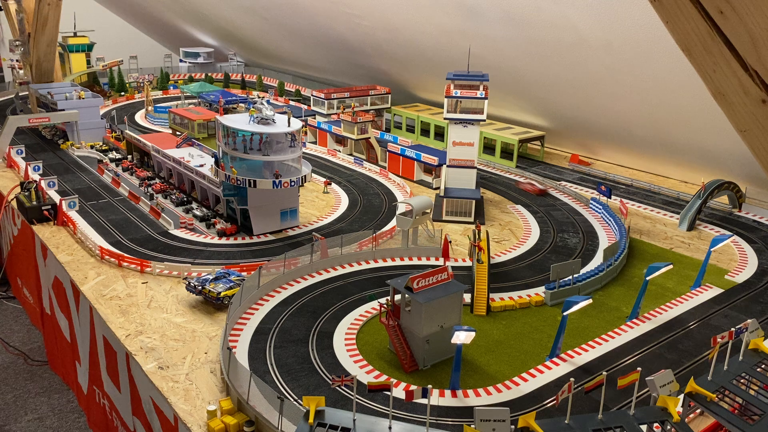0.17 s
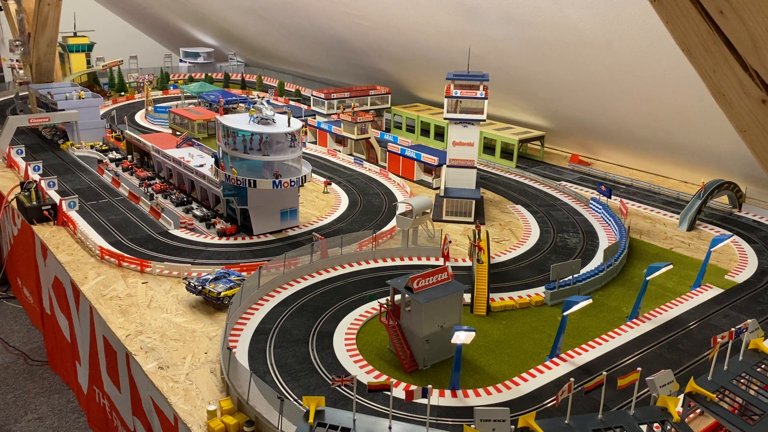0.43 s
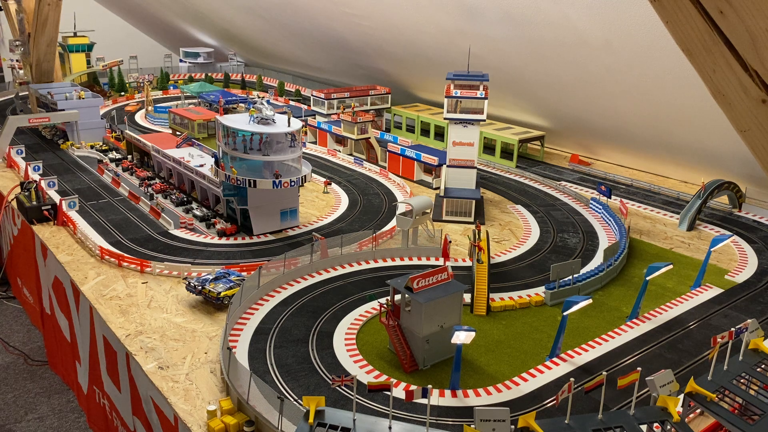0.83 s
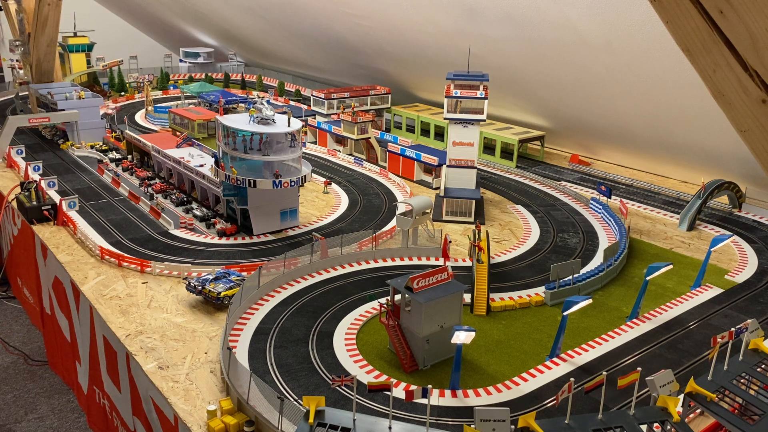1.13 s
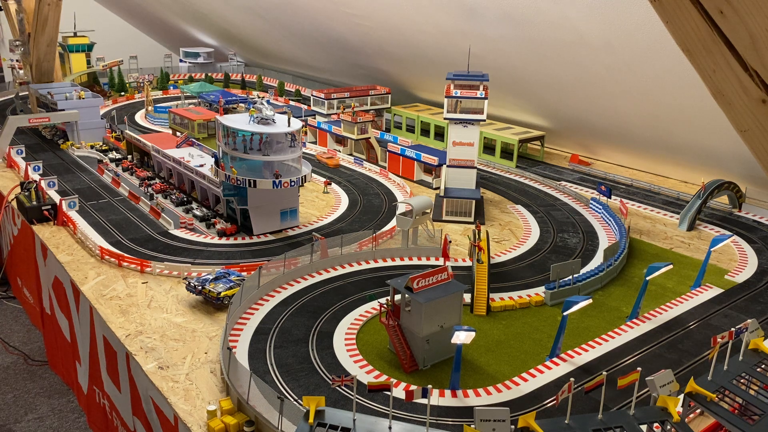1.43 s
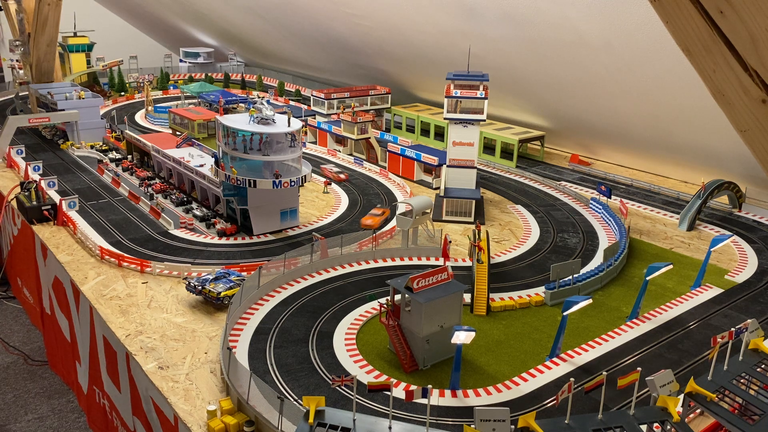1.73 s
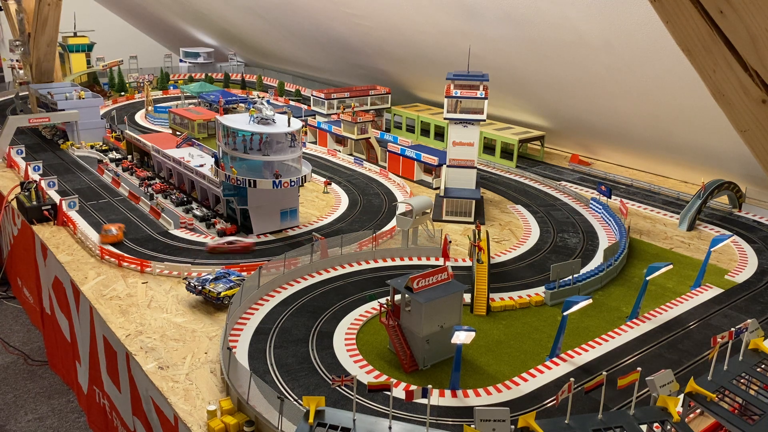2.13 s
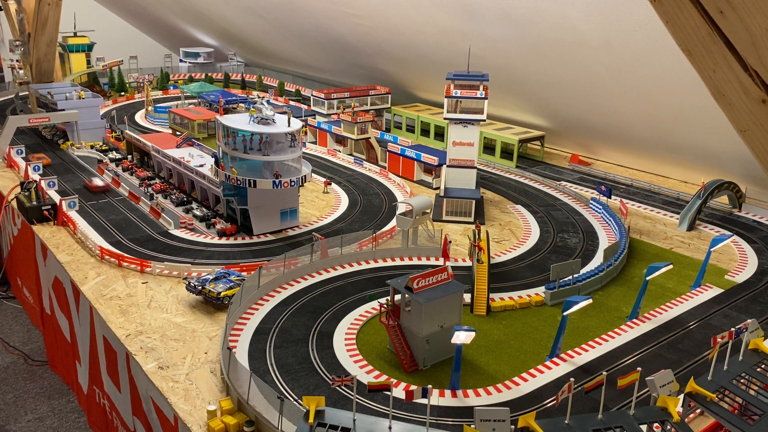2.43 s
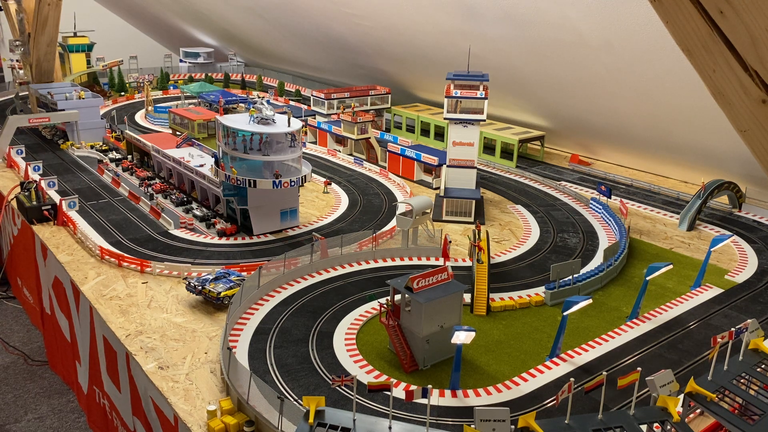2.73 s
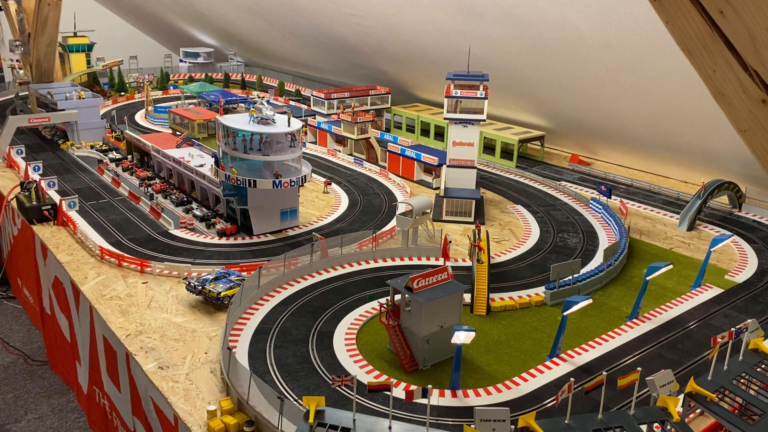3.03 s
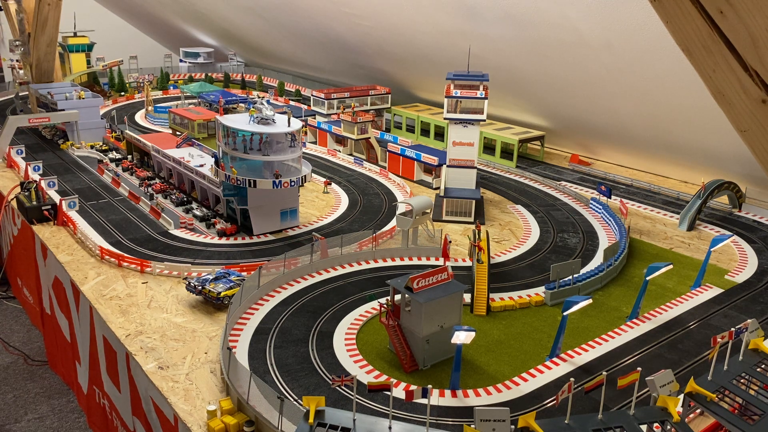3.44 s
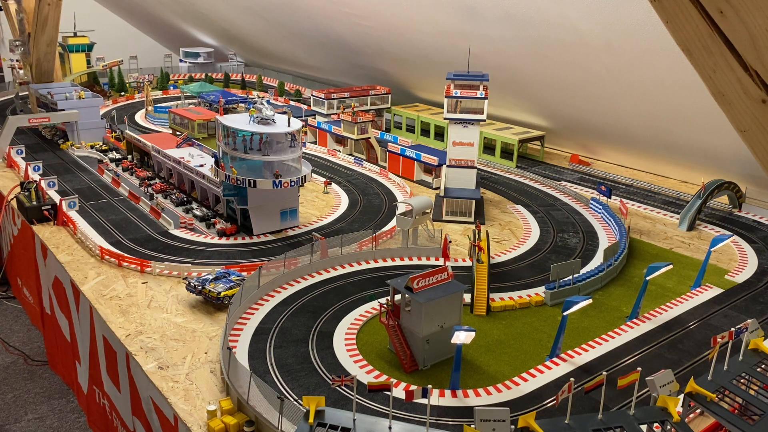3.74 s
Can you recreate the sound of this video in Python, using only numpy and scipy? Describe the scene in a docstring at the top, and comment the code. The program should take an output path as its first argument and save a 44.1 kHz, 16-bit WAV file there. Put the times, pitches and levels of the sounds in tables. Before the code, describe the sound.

Small toy racing cars rattle through a near bend, whine higher, slow down and fade, then speed up again; braids hiss, tyres rasp and lane switches clack, with a short, dry attic room response.

```python
"""Slot cars in an attic

Two slot cars lap a plastic track on a tabletop in an attic, heard by a small stereo microphone pair.
Gears whine with speed, pickup braids hiss on the rails, tyres rasp and the table rumbles.
Cars clack over lane switches and thump over joints; at first one rattles loudly through the nearest bend.
Whines are phase-run tones with rasp, rubbing is coloured noise, and knocks are short decaying modes."""
import sys
import numpy as np
from scipy import signal
from scipy.fft import rfft, irfft, next_fast_len
from scipy.io import wavfile
from scipy.ndimage import uniform_filter1d, map_coordinates

SR = 44100
rng = np.random.default_rng(int(sys.argv[2]) if len(sys.argv) > 2 else 0)


def master(y):
    """Save y as 16-bit WAV."""
    cut = np.clip(np.atleast_2d(y).T, -1, 1)
    pcm = np.round(cut * 32767)  # scale
    wavfile.write(sys.argv[1], SR, pcm.astype(np.int16))


N = 171108

# Table levels are relative; most sources add a trim, thumps and wheel hum do not.
# Gear mesh of each car: time_s, mesh_pitch_hz, level_db
CAR_A_MESH = [(0, 2740, -39), (.08, 2662, -46), (.115, 2028, -43), (.18, 1828, -38), (.25, 1996, -38.5),
              (.34, 2245, -39.5), (.42, 2395, -42.5), (.52, 2460, -44.5), (.72, 1794, -49), (.88, 998, -52),
              (.96, 1100, -47), (1.02, 1270, -47), (1.11, 1420, -43), (1.25, 1800, -49), (1.4, 1480, -48),
              (1.49, 1402, -40.5), (1.8, 1314, -42.5), (2.07, 1381, -40), (2.2, 1682, -44.5),
              (2.37, 1818, -38.5), (2.47, 2080, -38.5), (2.55, 2350, -43.5), (2.65, 2620, -40.5),
              (2.7, 2597, -47), (2.85, 1699, -72), (3.03, 1609, -58), (3.12, 1812, -44), (3.2, 2030, -39.5),
              (3.35, 1900, -52), (3.49, 1896, -43.5), (3.6, 1755, -47), (3.67, 1990, -43),
              (3.77, 2392, -49), (3.88, 2600, -43)]
CAR_B_MESH = [(0, 1250, -69), (.5, 1123, -49), (.6, 1129, -36.5), (.75, 1033, -54), (1.3, 1499, -57),
              (1.5, 1601, -47), (1.61, 1994, -39.5), (1.8, 1501, -56), (2.26, 1311, -39.5),
              (2.45, 1375, -60), (2.72, 1420, -43), (2.88, 1295, -49), (3.03, 1401, -51), (3.35, 1420, -50),
              (3.47, 1508, -45), (3.68, 1400, -39), (3.77, 1750, -43.5), (3.83, 1972, -39.5),
              (3.88, 2140, -41)]
# Gear whine partials: multiple of the mesh pitch, level_db
GEAR_PARTIALS = [(1, 0.5), (1.2, -10), (2.16, -13)]
GEAR_DB, PINION_TEETH, SHAFT_DEPTH = 2.5, 9, 0.42
GEAR_JITTER = 0.0203  # rms share of the pitch
GEAR_RASP, RASP_RATE = 0.88, 280  # rasp against tone; knots a second
GEAR_FLUTTER_DB, GEAR_SWAY_DB, SWAY_RATE = 1.5, 1.3, 40  # rms dB, rms dB, knots a second
# The body shell rings when an overtone sweeps through it
SHELL_HZ, SHELL_WIDTH_HZ, SHELL_DB = 5660, 220, 11

# Brief chirps as the gears bite: start_s, level_db, pitch_hz
CHIRPS = [(.109, -26.5, 1960), (.134, -23.5, 1990), (.257, -30, 2040), (.34, -24.5, 2216),
          (1.089, -29.5, 1480), (1.478, -25, 1485), (2.266, -27, 1270), (2.382, -29, 1890),
          (2.539, -25, 1393)]
CHIRP_RISE_S = 0.003

# Pickup braid hiss, tyre rasp and hollow plastic deck, each: time_s, level_db
BRAID_LEVEL = [(0.0, -28.5), (0.04, -34), (0.22, -39), (0.24, -35), (0.5, -35.5), (0.73, -49.5),
               (1.13, -43), (1.4, -46.5), (1.62, -40.5), (1.8, -44.5), (2.2, -40), (2.28, -41.5),
               (2.48, -34.5), (2.66, -36), (2.73, -47.5), (2.88, -55), (3.21, -40.5), (3.35, -47.5),
               (3.88, -37)]
TYRE_LEVEL = [(0.03, -27.5), (0.06, -35), (0.57, -35), (0.71, -39), (0.89, -41), (0.95, -37), (1.46, -39),
              (1.51, -36), (2.7, -34), (2.89, -43), (3.24, -36), (3.26, -37.5), (3.41, -42), (3.46, -35.5),
              (3.88, -37)]
DECK_LEVEL = [(.03, -29.5), (.07, -39), (.5, -43), (.62, -39), (.8, -47), (1.1, -44), (1.52, -43.5),
              (1.6, -35.5), (1.68, -39), (1.9, -40.5), (2.17, -35.5), (2.28, -44), (2.45, -40), (2.68, -37),
              (2.92, -48), (3.3, -45.5), (3.88, -46)]
# Table board: time_s, drone_level_db, boom_level_db
BOARD_LEVEL = [(0, -35, -36.5), (.14, -46, -41.5), (.3, -43.5, -42.5), (.48, -43, -44.5),
               (.66, -39.5, -37.5), (.82, -48.5, -51.5), (1, -50, -53), (1.4, -46, -46), (1.62, -43, -40.5),
               (1.85, -44, -43.5), (2.15, -44, -51), (2.45, -45, -49.5), (2.76, -39.5, -44),
               (2.92, -49, -50.5), (3.25, -41.5, -45.5), (3.52, -40, -48), (3.7, -45, -39),
               (3.88, -40, -45)]
# Deep rumble: time_s, level_db
RUMBLE_LEVEL = [(0, -48), (.3, -46), (.55, -50), (.8, -49), (1.05, -51.5), (1.6, -48), (2.2, -46.5),
                (2.5, -51), (3.1, -49), (3.45, -50.5), (3.88, -41.5)]
# Spectra of the rubbing and the board, each: frequency_hz, density_db (per Hz)
BRAID_COLOUR = [(1500, -15), (3000, -7.5), (4100, -4.5), (5400, 1.5), (6500, -1), (7500, 1), (8900, -5.5),
                (9900, -0.5), (10800, -4.5), (12200, -6.5), (14500, -4), (15800, -7.5)]
TYRE_COLOUR = [(600, -19), (1000, -8.5), (1380, 2.5), (1650, -1.5), (2000, 0.5), (2550, -5.5), (3000, -7.5),
               (4000, -11.5), (7000, -16), (12000, -76)]
DECK_COLOUR = [(200, -44), (450, 0), (650, -0.5), (850, 1.5), (1100, 1.5), (1500, -11), (3000, -36)]
DRONE_COLOUR = [(100, -21), (190, -4), (240, 3.5), (310, 0.5), (440, -1), (600, -14), (1200, -38)]
BOOM_COLOUR = [(60, -30), (92, -6), (128, 5), (175, -2.5), (240, -13), (600, -74)]
RUMBLE_COLOUR = [(20, -42), (31, -7), (48, -5.5), (62, -0.5), (80, 0.5), (100, -4), (200, -29)]
BRAID_DB, TYRE_DB, DECK_DB, DRONE_DB, BOOM_DB, RUMBLE_DB = 2, -1.5, 0, 1, 0, 2.5

# A wheel drums on the board as the car passes close: time_s, axle_turns_hz, level_db
AXLE = [(.42, 46, -56), (.48, 45, -42), (.61, 46, -40), (.69, 47, -42), (.8, 40, -43), (.88, 40, -62)]
# Wheel hum partials: multiple of the axle rate, level_db
AXLE_ORDERS = [(2, -3.5), (3, -2), (4, -9), (5, -8)]

# Lane switch clacks: start_s, level_db
CLACKS = [(0.0789, -15), (0.5715, -15), (1.6867, -16), (1.951, -24.5), (2.127, -23), (2.6779, -15.5),
          (3.2292, -20)]
# Contacts within one clack: delay_s, level_db
CLACK_CONTACTS = [(0, -0.5), (.0014, -1.5), (.003, -1.5)]
# Ringing of a struck switch: frequency_hz, level_db, t60_s
CLACK_MODES = [(1250, -6, .012), (2150, -4, .012), (2560, 2, .014), (3400, -5, .01), (5500, 0, .011)]
CLACK_ROOM_DB = -12

# Contacts of the rattle in the near bend: start_s, level_db
RATTLE = [(.002, -17.5), (.0065, -24), (.012, -21.5), (.019, -26), (.025, -23.5), (.037, -27)]
# Ringing of the rattled track: frequency_hz, level_db, t60_s
RATTLE_MODES = [(579, -1.5, .06), (746, 5.5, 0.067), (882, 7, 0.047), (974, 6, 0.068), (1190, 5.5, 0.047),
                (1320, 4, 0.016), (1806, 5, 0.049), (2500, -3, 0.041)]

# Thumps over track joints: start_s, level_db, pitch_hz
THUMPS = [(0.275, -17.5, 112), (.35, -19.5, 110), (.68, -22, 240), (.79, -25, 80), (2.343, -21, 378.7),
          (2.821, -24, 366.8), (3.242, -26, 264), (3.294, -25.5, 240), (3.5, -20, 183), (3.689, -21, 140),
          (3.821, -20, 230), (3.834, -22, 121)]
THUMP_T60_S = 0.035

# Decay of the attic: frequency_hz, t60_s
ROOM_T60 = [(150, 0.25), (2000, 0.3), (10000, 0.1)]

# Microphone pair, likeness of the two sides: frequency_hz, likeness (0 to 1)
ALIKE = [(60, .98), (200, .88), (450, .58), (700, .15), (1300, .42), (2050, .28), (2550, .8), (3300, .3),
         (4200, .62), (5500, .3), (7000, .95), (8000, .85), (9000, .97), (10000, .85), (11200, .95),
         (12300, .75), (13200, .95), (14400, .8), (15400, .95)]
# Microphone pair, phase lead of the left: frequency_hz, lead_rad
LEAD = [(0, 0), (600, -.5), (950, 1.7), (1650, 1.7), (2300, .1), (3050, .7), (3700, .1), (7000, 0),
        (7500, -.5), (9000, -3.14), (11200, -6.28), (13250, -9.42), (15400, -12.57)]
# Microphone pair, left over right: frequency_hz, difference_db
TILT = [(100, -1.8), (600, -2), (1700, -2), (2400, 0), (3100, 3.5), (4100, 0.5), (5600, 4), (6800, 1),
        (9000, 0.5)]
LOW_CUT_HZ, TOP_HZ = 36, 15850


def gears(car):
    """Teeth mesh unevenly: a swaying whine wrapped in rasp of the same pitch, throbbing once per motor turn."""
    hz, db = curves(car)
    jitter = GEAR_JITTER * wobble(350) + 0.015 * wobble(35)
    turns = np.cumsum(hz * (1 + jitter)) / SR  # in mesh cycles
    mesh = np.zeros((2, N))
    for multiple, level in GEAR_PARTIALS:
        rasp = np.array([wobble(RASP_RATE) + 1j * wobble(RASP_RATE) for _ in "LR"]) / np.sqrt(2)
        tone = np.exp(1j * np.array([wobble(25), wobble(25)]))
        shell_db = SHELL_DB / (1 + ((multiple * hz - SHELL_HZ) / SHELL_WIDTH_HZ) ** 2)
        carrier = np.exp(2j * np.pi * multiple * turns)
        mesh += amp(level + shell_db) * np.real((tone + GEAR_RASP * rasp) * carrier)
    throb = 1 + SHAFT_DEPTH * np.sin(2 * np.pi * turns / PINION_TEETH)
    flutter = amp(GEAR_FLUTTER_DB * wobble(110) + GEAR_SWAY_DB * wobble(SWAY_RATE))
    return amp(db + GEAR_DB) * unit(spread(mesh * throb * flutter))


def chirps():
    """The whine flares for a few milliseconds as the gears bite."""
    out, t = np.zeros(N), np.arange(SR // 10) / SR
    for s, db, hz in CHIRPS:
        phase = 2 * np.pi * hz * t + 0.5 * wobble(470)[:len(t)]
        flare = t / CHIRP_RISE_S * np.exp(1 - t / CHIRP_RISE_S)
        add(out, s, amp(db + 0.5) * flare * np.sin(phase))
    return out + amp(-7) * room(out)


def braids():
    """Pickup braids scrape the rails with a chattering hiss."""
    level, = curves(BRAID_LEVEL)
    return amp(level + BRAID_DB) * rub(BRAID_COLOUR, chatter_db=1.0, chatter_rate=470, patchy_db=3)


def tyres():
    """Tyres rasp on the plastic track."""
    level, = curves(TYRE_LEVEL)
    return amp(level + TYRE_DB) * rub(TYRE_COLOUR, chatter_db=1.5, chatter_rate=170, patchy_db=2.5)


def deck():
    """The hollow plastic deck resounds, shaken by the tyres."""
    level, = curves(DECK_LEVEL)
    return amp(level + DECK_DB) * rub(DECK_COLOUR, chatter_db=1.5, chatter_rate=90, patchy_db=1.5)


def rattle():
    """A car's tail chatters against the edge of the near bend; the track radiates it from all sides."""
    out = np.zeros((2, N))
    for s, db in RATTLE:
        knocks = [knock(RATTLE_MODES, crack_db=-0.5, crack_s=0.035, crack_hz=4170) for _ in "LR"]
        add(out, s, amp(db - 6) * np.array(knocks))
    return spread(out)


def switches():
    """The guide blade strikes a switch tongue, which chatters against its stop."""
    out = np.zeros(N)
    for s, db in CLACKS:
        for delay, contact_db in CLACK_CONTACTS:
            contact = knock(CLACK_MODES, crack_db=-1.0, crack_s=0.0064, crack_hz=5470)
            add(out, s + delay, amp(db + contact_db - 9) * contact)
    return out + amp(CLACK_ROOM_DB) * room(out)


def joints():
    """Wheels drop over joints and thump the board: short decaying low tones."""
    out, t = np.zeros(N), np.arange(SR // 5) / SR
    onset = 1 - np.exp(-t / 0.0024)
    for s, db, hz in THUMPS:
        add(out, s, amp(db - 60 * t / THUMP_T60_S) * np.sin(2 * np.pi * hz * t) * onset)
    return out + amp(-4) * room(out)


def wheel_hum():
    """An out-of-round wheel hums at multiples of the axle speed and sinks as the car brakes."""
    hz, db = curves(AXLE)
    turns, t = np.cumsum(hz) / SR, np.arange(N) / SR
    hum = np.zeros(N)
    for multiple, level in AXLE_ORDERS:
        tone = np.sin(2 * np.pi * (multiple * turns + rng.random()))
        hum += amp(level + 2.3 * wobble(20.3)) * tone
    return amp(db) * unit(hum) * (t > AXLE[0][0]) * (t < AXLE[-1][0])


def table():
    """The board below the track drones and booms under the cars, over a deep rumble."""
    drone, boom = curves(BOARD_LEVEL)
    rumble, = curves(RUMBLE_LEVEL)
    return (amp(drone + DRONE_DB) * rub(DRONE_COLOUR, chatter_db=0.0, chatter_rate=60, patchy_db=2.5)
            + amp(boom + BOOM_DB) * rub(BOOM_COLOUR, chatter_db=1.6, chatter_rate=40, patchy_db=0.6)
            + amp(rumble + RUMBLE_DB) * rub(RUMBLE_COLOUR, chatter_db=2.5, chatter_rate=51, patchy_db=2.5))


def room(x):
    """The attic's short answer: noise decaying at a rate set by frequency, different at each microphone."""
    hz, t, z = signal.stft(rng.standard_normal((2, SR // 2)), SR, nperseg=256)
    decay = amp(-60 * t / along(ROOM_T60, hz)[:, None])
    tail = signal.istft(z * decay, SR, nperseg=256)[1]
    late = np.pad(x, (200, 0))[None]  # delayed by 200 samples
    return spread(signal.fftconvolve(late, tail / np.linalg.norm(tail[0]), axes=1)[:, :N])


def rub(colour, chatter_db, chatter_rate, patchy_db):
    """Contact noise of rms 1: it chatters as the contact bounces, and its colour shifts along the track."""
    z = signal.stft(rng.standard_normal((2, N)), nperseg=1024)[2]
    field = uniform_filter1d(rng.standard_normal(z.shape[1:]), 5, 0)  # smooth over frequency
    field = uniform_filter1d(field, 6, 1)  # smooth over time
    pair = signal.istft(z * amp(patchy_db * unit(field)), nperseg=1024)[1][:, :N]
    pair = pair * amp(chatter_db * wobble(chatter_rate))
    return unit(spread(filtered(pair, lambda hz: amp(along(colour, hz)))))


def knock(modes, crack_db, crack_s, crack_hz):
    """One contact on plastic: short modes and a dull crack of low-passed noise."""
    t = np.arange(SR // 5) / SR
    ring = np.zeros(len(t))
    for hz, db, t60 in modes:
        decay = amp(db + rng.normal(0, 2.4) - 60 * t / t60)  # every contact excites the modes differently
        ring += decay * np.sin(2 * np.pi * (hz * t + rng.random()))
    dull = signal.butter(2, min(crack_hz, SR / 3), fs=SR)
    noise = signal.lfilter(*dull, rng.standard_normal(len(t)))
    crack = amp(crack_db - 60 * t / crack_s) * unit(noise)
    return (ring + crack) * (1 - np.exp(-t / 0.00017))


def spread(pair):
    """Two unrelated signals become left and right, as alike as the microphones hear them."""
    def shares(hz):
        turn = np.arccos(np.clip(along(ALIKE, hz), 0, 0.995)) / 2
        return np.array([np.cos(turn), np.sin(turn)])
    mid, side = filtered(pair, shares)
    return np.array([mid + side, mid - side])


def amp(db):
    """Decibels to amplitude."""
    return 10 ** (np.asarray(db) / 20)


def unit(x):
    """Scale to rms 1."""
    return x / np.sqrt(np.mean(x ** 2) + 1e-20)


def along(points, hz):
    """Read (frequency_hz, value) points on a log frequency axis."""
    f, v = np.transpose(points)
    return np.interp(np.log(hz + 1), np.log(f + 1), v)


def curves(rows):
    """One value per sample for each column after the time."""
    s, *cols = np.transpose(rows)
    return [np.interp(np.arange(N) / SR, s, c) for c in cols]


def wobble(rate):
    """A smooth random curve of rms 1, rate knots a second."""
    coarse = np.linspace(0, N, N // 8)  # about every eighth sample
    curve = map_coordinates(rng.standard_normal(8192), [coarse * rate / SR], mode="wrap")
    return unit(np.interp(np.arange(N), coarse, curve))


def filtered(x, response):
    """Multiply the spectrum of x by a response of frequency."""
    m = next_fast_len(N + SR // 2)
    return irfft(rfft(x, m) * response(np.fft.rfftfreq(m, 1 / SR)), m)[..., :N]


def add(track, s, sound):
    """Mix a sound in at time s."""
    i = max(0, round(s * SR))
    track[..., i:i + sound.shape[-1]] += sound[..., :N - i]


def scene():
    """Both cars, their contact with the track, and the table beneath."""
    cars = gears(CAR_A_MESH) + gears(CAR_B_MESH) + chirps()
    contact = braids() + tyres() + deck()
    knocks = rattle() + switches() + joints()
    return cars + contact + knocks + wheel_hum() + table()


def record(dry):
    """The two microphones differ in phase and colour; the deepest bass and the very top are cut."""
    sides = np.array([[0.5], [-0.5]])  # half of each difference to either side

    def response(hz):
        band = (1 - np.exp(-(hz / LOW_CUT_HZ) ** 6)) * (hz < TOP_HZ)
        lead = np.interp(hz, *np.transpose(LEAD))
        return amp(sides * along(TILT, hz)) * np.exp(1j * sides * lead) * band
    return filtered(dry, response)


dry = scene()
out = record(dry)
master(out)
```